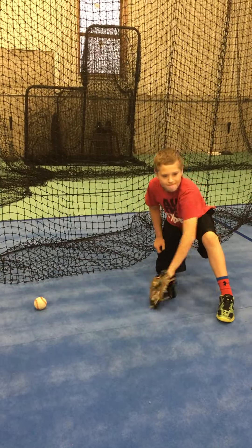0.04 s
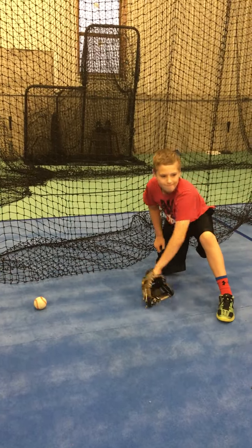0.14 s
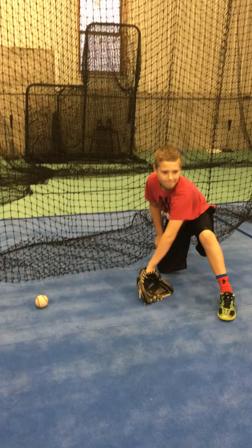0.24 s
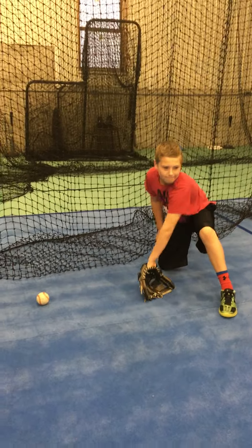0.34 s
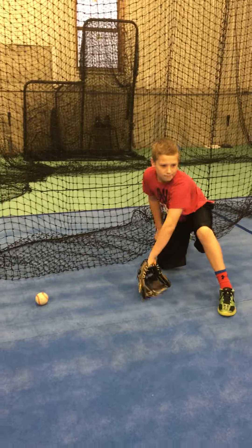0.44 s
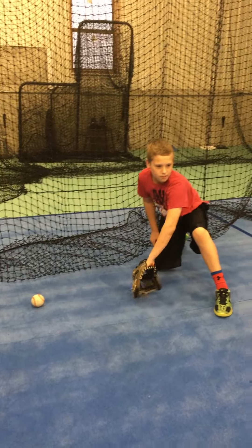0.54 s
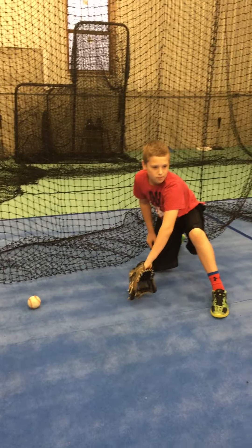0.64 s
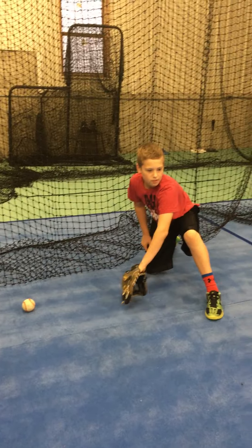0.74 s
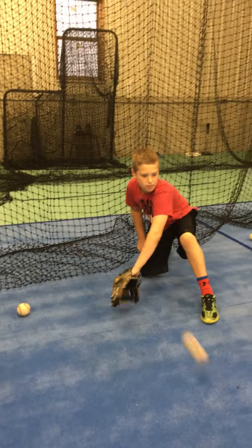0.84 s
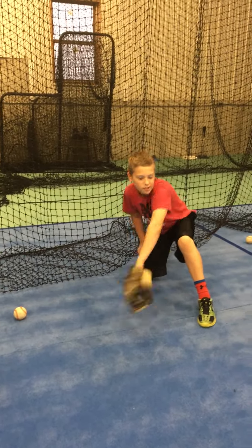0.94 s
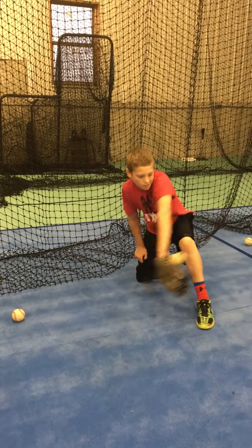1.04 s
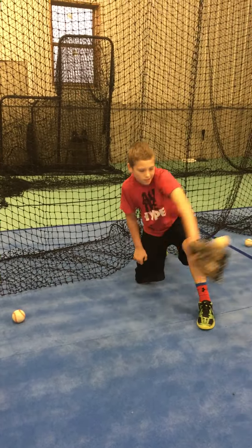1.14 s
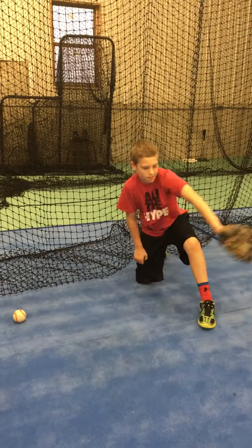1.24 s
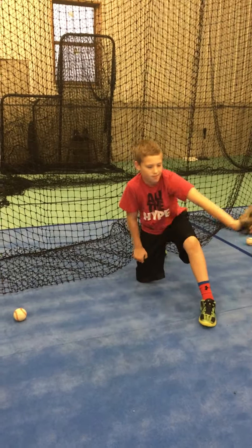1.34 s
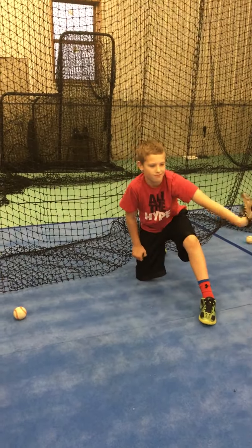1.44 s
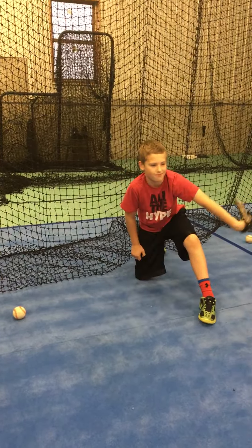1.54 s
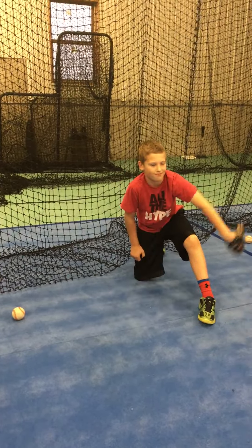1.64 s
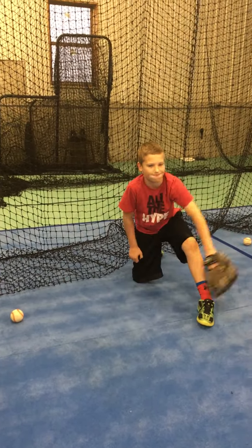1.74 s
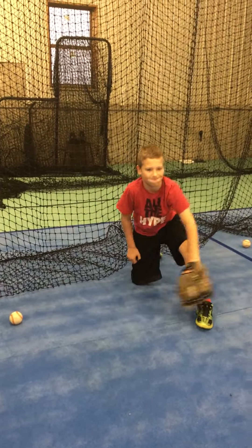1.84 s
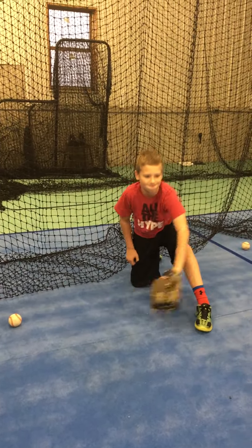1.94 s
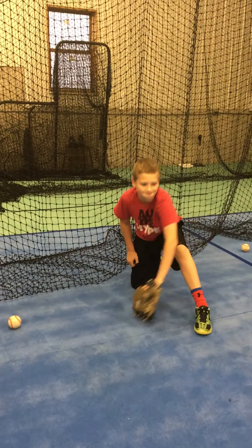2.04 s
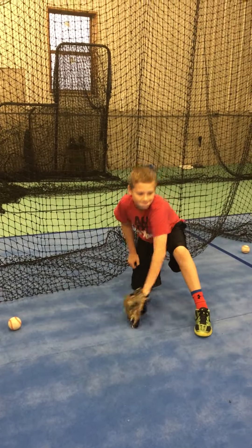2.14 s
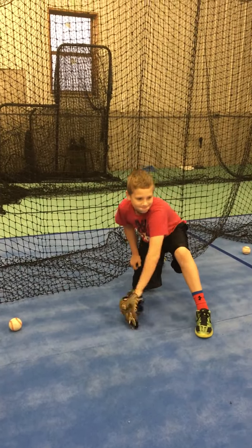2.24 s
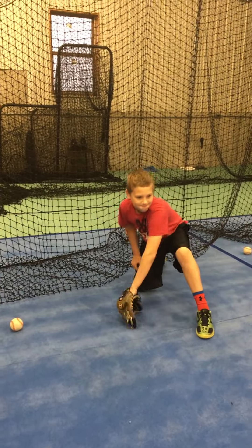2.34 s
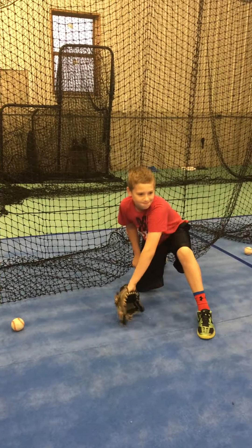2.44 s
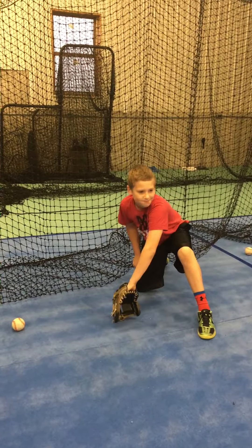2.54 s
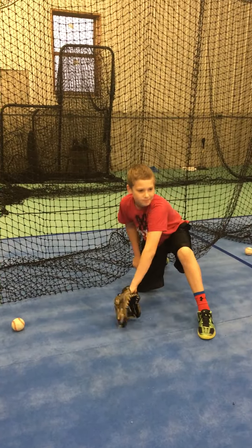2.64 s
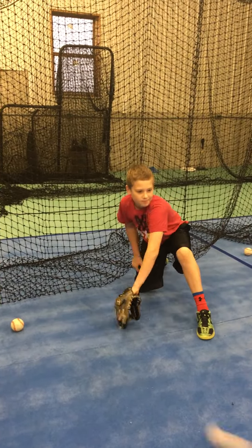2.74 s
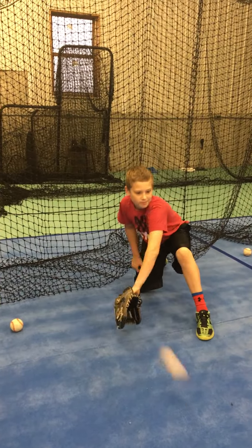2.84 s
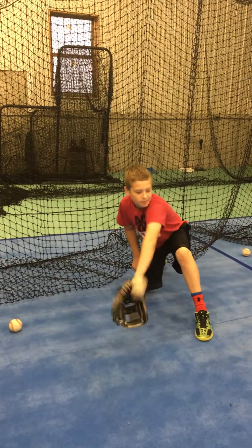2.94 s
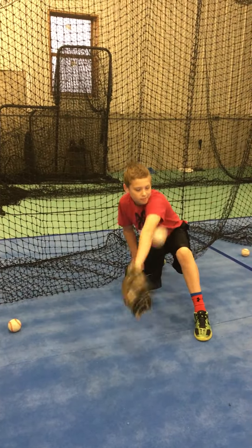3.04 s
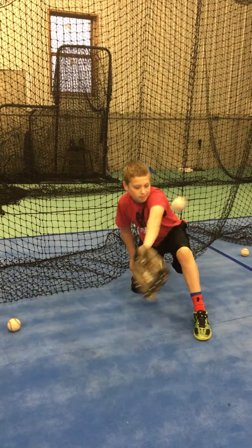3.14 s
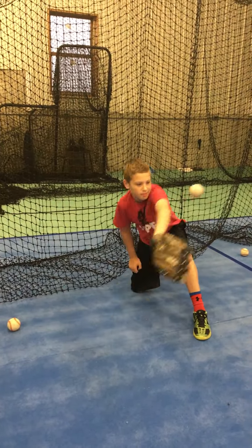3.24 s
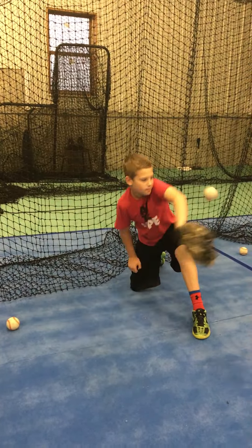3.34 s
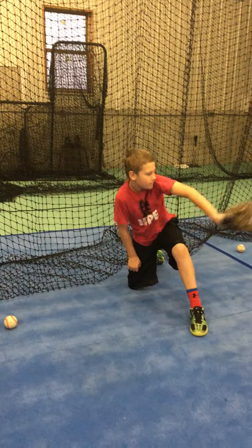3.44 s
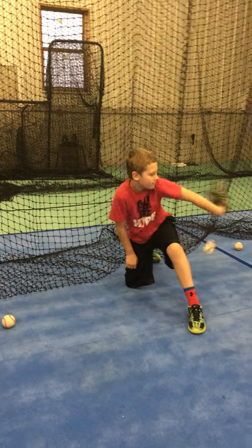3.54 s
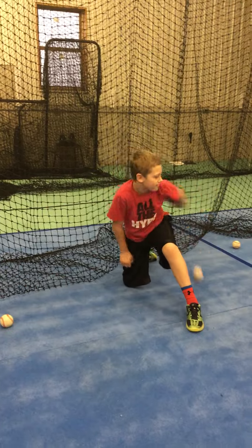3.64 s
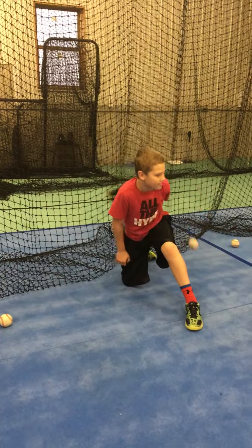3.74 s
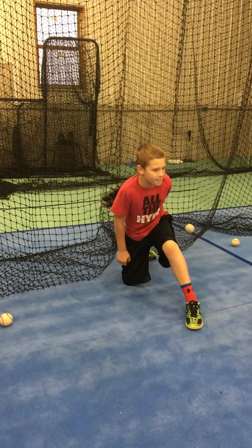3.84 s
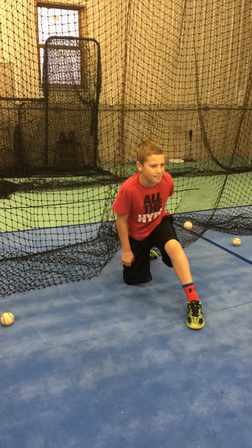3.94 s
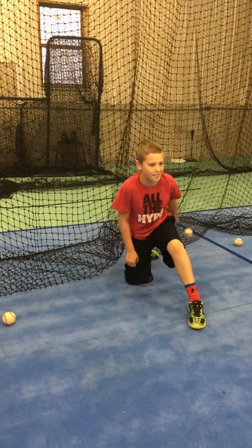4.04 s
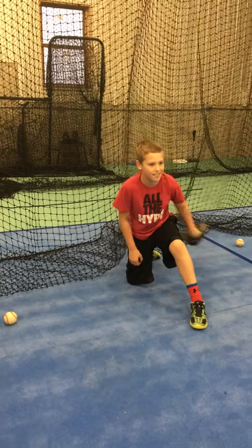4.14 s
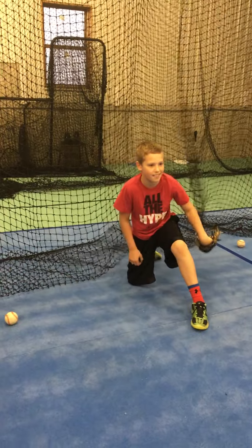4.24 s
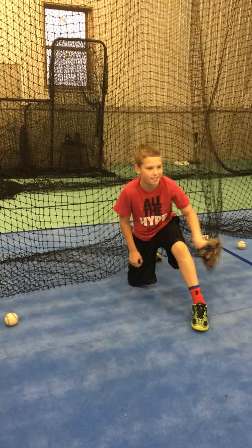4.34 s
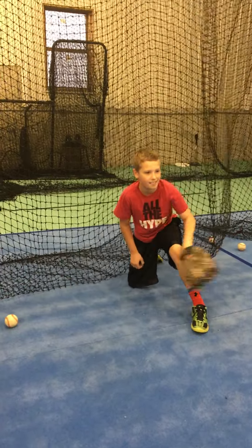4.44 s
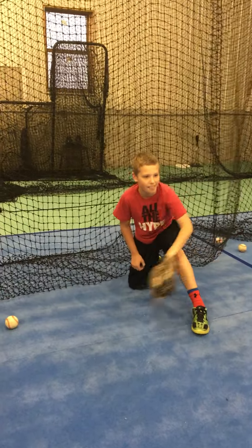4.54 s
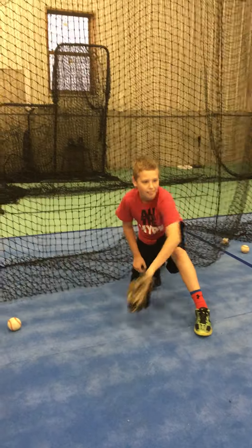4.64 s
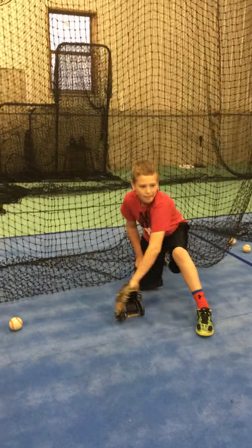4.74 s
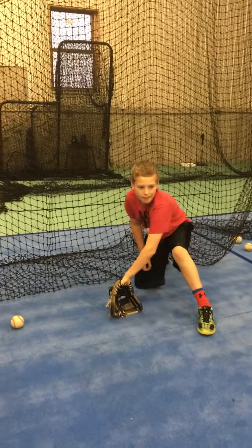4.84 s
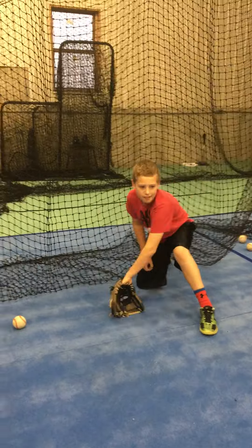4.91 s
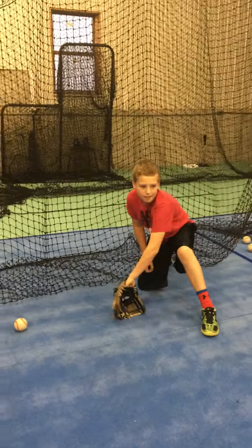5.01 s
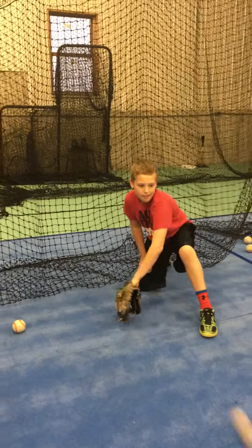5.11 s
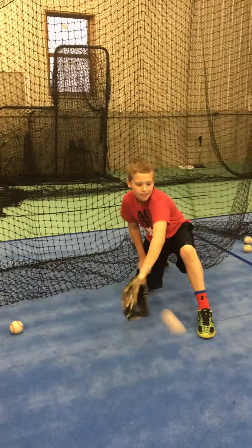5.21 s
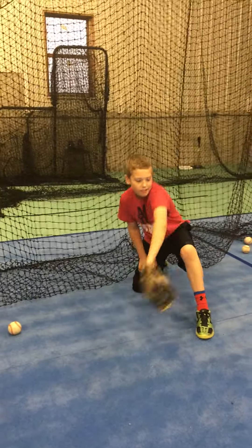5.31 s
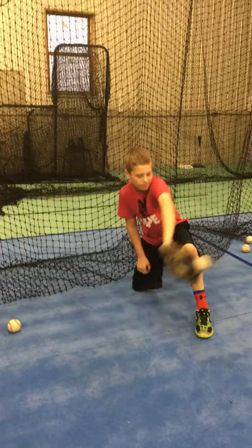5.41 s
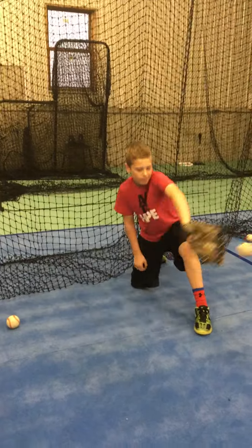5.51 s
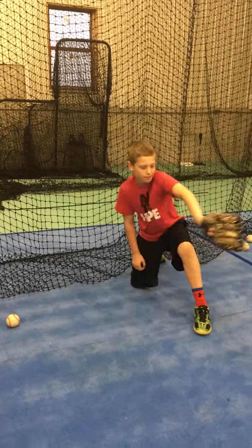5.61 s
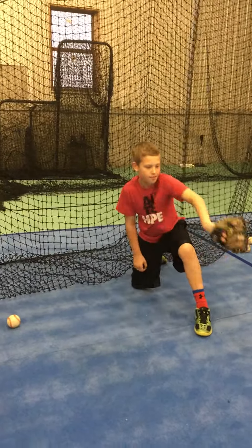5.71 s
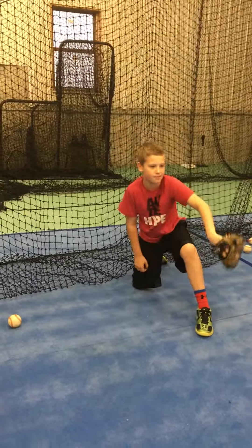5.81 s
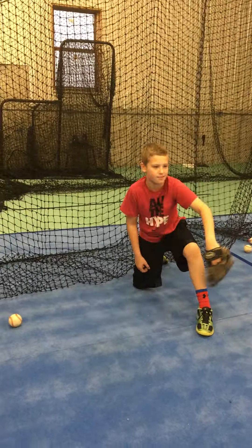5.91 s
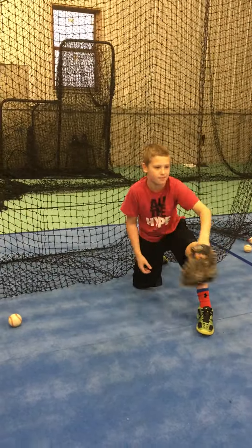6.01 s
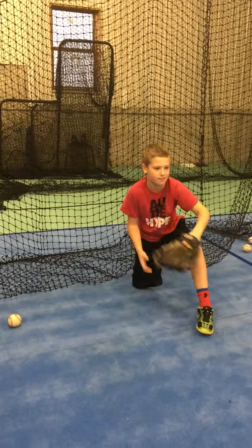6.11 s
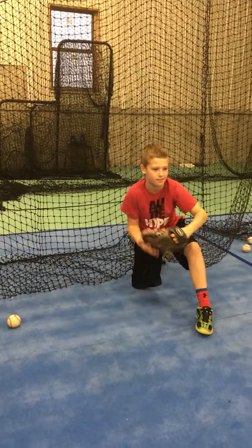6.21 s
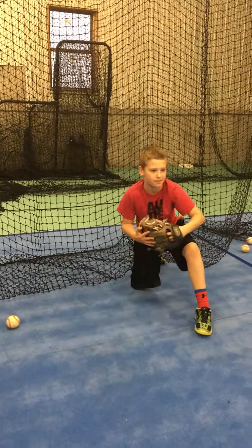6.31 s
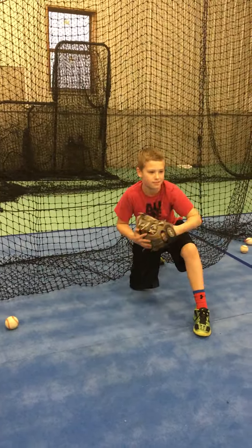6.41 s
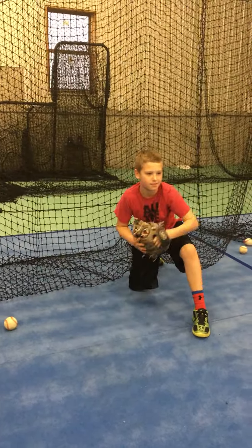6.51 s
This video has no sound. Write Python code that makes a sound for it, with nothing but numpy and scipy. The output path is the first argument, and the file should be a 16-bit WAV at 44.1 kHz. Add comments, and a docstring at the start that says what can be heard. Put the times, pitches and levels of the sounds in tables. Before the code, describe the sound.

Three fielding catches: each a dull, hard bounce followed at once by a leathery smack, the first sharpest. After each, the ball drops away with a more distant, reverberant knock, light rolling scuffs, small clicks and sliding netting. Soft knee and shoe shuffles close the sequence. A nearby handheld phone picks up a hard-walled sports hall with a faint bass rumble of moving air.

```python
"""Baseball fielding drill in an indoor cage

A baseball hops on the turf and smacks into a leather glove, three times; later hops sound farther off.
Knocks, thumps and hollow notes are damped vibrations; cracks, scuffs and sliding netting are shaped noise.
The hall answers the blows with echoes and a fading tail, over a low ventilation rumble."""
import sys
import numpy as np
from scipy import signal
from scipy.fft import rfft, irfft, next_fast_len
from scipy.io import wavfile
from scipy.ndimage import uniform_filter1d

SR = 44100
rng = np.random.default_rng(int(sys.argv[2]) if len(sys.argv) > 2 else 0)


def persist_wave(psi):
    """Save psi, clipped to +-1, as 16-bit WAV."""
    counts = np.round(np.clip(psi, -1, 1) * 32767).astype(np.int16)
    wavfile.write(sys.argv[1], SR, np.atleast_2d(counts).T)


N = 289737  # length of the scene [samples]
HALL_RADIUS_M = 3.38  # a source's distance over this sets the gain of its hall sound


def amp(db):
    """Turn decibels into gain."""
    return 10 ** (np.asarray(db) / 20)


def unit(x):
    """Scale a signal to rms 1."""
    return x / np.sqrt(np.mean(x ** 2) + 1e-20)


def along(points, hz):
    """Read a curve of (frequency [Hz], value) points on a log frequency axis."""
    point_hz, values = np.transpose(points)
    return np.interp(np.log(hz + 1), np.log(point_hz), values)


def noise(spectrum, size):
    """Noise of rms 1, coloured by weighting each frequency of random samples."""
    hz = np.fft.rfftfreq(size, 1 / SR)
    white = rfft(rng.standard_normal(size))
    return unit(irfft(white * amp(along(spectrum, hz)), size))


def fade(t, t60):
    """Exponential decay from t = 0 that loses 60 dB in t60 seconds."""
    return np.exp(-np.log(1000) * np.maximum(t, 0) / t60) * (t >= 0)


def ring(t, hz, t60):
    """One damped vibration: a sine that dies away."""
    return np.sin(2 * np.pi * hz * t) * fade(t, t60)


def push(t, hz, t60, rise):
    """A damped vibration that swells briefly; its rate of change is heard, so no steady pressure is left."""
    motion = ring(t, hz, t60) * (1 - np.exp(-np.maximum(t, 0) / rise))
    return np.diff(motion, prepend=0) * SR / (2 * np.pi * hz)


def puff(spectrum, size=256):
    """One sharp pressure pulse of unit energy with this colour."""
    hz = np.fft.rfftfreq(size, 1 / SR)
    pulse = np.roll(irfft(amp(along(spectrum, hz))), size // 2)
    return pulse / np.linalg.norm(pulse)


def soften(x, edge_hz, order):
    """Low-pass filter: a contact that takes time loses its sharpest treble."""
    sos = signal.butter(order, min(edge_hz, SR / 2 - 1), fs=SR, output="sos")
    return signal.sosfilt(sos, x)


def add(track, s, x):
    """Mix x into the track at time s [s]."""
    i = max(round(s * SR), 0)
    track[i:i + len(x)] += x[:max(len(track) - i, 0)]


def hall(x, build=0.0085, sparse=0.086):
    """The hall's answer from one spot: a few wall echoes, then a tail that thickens and darkens."""
    # first wall echoes: (delay [s], level before softening [dB])
    walls = [(.0129, -12), (.0202, -11), (.0350, -16), (.0398, -15)]
    # time for the tail to lose 60 dB: (frequency [Hz], time [s])
    tail_t60 = [(100, 0.27), (260, 1.91), (600, 0.73), (1100, 1.115), (2500, 1.006), (5000, 0.72),
                (8000, 0.63), (14000, 0.26)]
    # colour of the tail: (frequency [Hz], relative level [dB])
    tail_tone = [(50, -12), (130, 5), (340, -0.5), (520, 5), (800, -3), (2000, -1), (4000, -1.5),
                 (9000, -5), (15000, -1.5)]
    hz, t, z = signal.stft(rng.standard_normal(SR + SR // 4), SR, nperseg=256)
    z = z * amp(along(tail_tone, hz))[:, None] * fade(t, along(tail_t60, hz)[:, None])
    tail = signal.istft(z, SR, nperseg=256)[1]
    t = np.arange(len(tail)) / SR
    # scattered sound is still thin when the first wall answers
    tail *= (1 - np.exp(-(t / build) ** 2)) / np.sqrt(SR * .08)
    # single reflections, about 170 a second, stand out before the echoes merge
    hits = rng.choice([-1, 1], len(t)) * (rng.random(len(t)) < 170 / SR)
    echoes = amp(-15) * hits * np.exp(-t / sparse) * (t > walls[1][0])
    for delay, db in walls:
        echoes[round(delay * SR)] += amp(db)
    return signal.fftconvolve(x, tail + soften(echoes, edge_hz=2300, order=1))


def ventilation():
    """Moving air gives a steady rumble: noise that is strongest in the bass."""
    # colour of the rumble: (frequency [Hz], relative level [dB])
    air = [(12, -23), (20, -56), (50, 3), (74, 3.5), (130, -3), (177, -10.5), (210, -9.5), (422, -20),
           (472, -18), (527, -18.5), (1030, -28.5), (1220, -26.5), (2670, -38.5), (8180, -42),
           (16000, -44.5)]
    return amp(-59.0) * noise(air, N)


def swish(grain_db=2):
    """Netting and cloth slide in a grainy hiss; every stroke swells to a rounded peak and dies away."""
    # strokes of netting and cloth: (time near the peak [s], level [dB], time scale of the rise [s])
    swishes = [(.17, -67, 0.18), (.64, -70, 0.043), (1.84, -71, 0.08), (2.07, -63.5, 0.049),
               (2.25, -65, 0.13), (2.67, -74, .045), (3.579, -71, 0.031), (3.8, -62.5, 0.03),
               (4.189, -53.5, 0.042), (4.3, -65.5, 0.21), (6.38, -70.5, 0.086), (6.52, -68.5, 0.11)]
    # colour of the sliding netting: (frequency [Hz], relative level [dB])
    net = [(300, -3), (1200, 5), (2500, 1), (4500, -5.5), (6500, -6.5), (9000, -9), (10500, -14.5),
           (13000, -13), (16000, -32)]
    release = 0.99  # time to die away over time to rise
    t = np.arange(N) / SR
    power = amp(-76) ** 2  # faint hiss that stays between the strokes
    for s, db, rise in swishes:
        u = (t - s) / rise
        stroke = 2 * np.exp(-np.logaddexp(-u, u / release))
        power = power + (amp(db) * stroke) ** 2
    wobble = unit(uniform_filter1d(rng.standard_normal(N), size=150))
    grain = unit(amp(grain_db * wobble))
    return np.sqrt(power) * grain * noise(net, N)


def rubs(strokes, spectrum, hall_db):
    """Rubbing makes short noise strokes that swell and die, roughened by the grain of the turf."""
    out = np.zeros(N)
    for s, db, length in strokes:
        u = np.arange(SR // 2) / SR / length
        wobble = unit(uniform_filter1d(rng.standard_normal(len(u)), size=240))
        grain = unit(amp(4 * wobble))
        swell = 2 * np.sqrt(u) * np.exp(-2 * u * u)
        add(out, s, amp(db) * noise(spectrum, len(u)) * grain * swell)
    return out + amp(hall_db) * hall(out)[:N]


def shuffles():
    """Knees and shoes shift with soft thuds: short strokes of dull noise."""
    # soft thuds: (start [s], relative level [dB], time scale [s])
    thuds = [(.07, -57, 0.057), (1.84, -53.5, 0.048), (4.07, -58.5, .025), (4.45, -55, 0.032),
             (6.39, -50.5, 0.084), (6.512, -46, 0.015), (6.55, -46, 0.019)]
    # colour of the thuds: (frequency [Hz], relative level [dB])
    body = [(40, -2), (90, 4.5), (200, 4), (330, 2), (600, -19), (1200, -8), (4000, -91)]
    return rubs(thuds, body, hall_db=1)


def scuffs():
    """Balls roll and scuff over the turf: strokes of noise whose treble is weak."""
    # strokes of the ball: (start [s], relative level [dB], time scale [s])
    strokes = [(0, -50, 0.036), (1.81, -48.5, 0.04), (3.559, -57, 0.016), (3.94, -51.5, 0.033),
               (3.972, -48, 0.021), (4.012, -49.5, 0.025), (4.14, -62.5, 0.34), (6.305, -51.5, 0.063),
               (6.345, -48, 0.069), (6.387, -47, 0.025), (6.54, -52.5, 0.027)]
    # colour of the turf: (frequency [Hz], relative level [dB])
    turf = [(100, -4), (300, -11), (650, -7.5), (1500, -6), (2800, -13), (4000, -24), (9000, -34),
            (16000, -46)]
    return rubs(strokes, turf, hall_db=-0.5)


def ticks():
    """Laces and netting click: tiny bursts of quickly fading noise, with their echo."""
    # small clicks: (time [s], relative level [dB])
    clicks = [(1.4255, -63), (1.8125, -56), (1.8905, -51), (3.1720, -54), (3.5625, -61), (4.3675, -46),
              (5.4715, -49), (5.7765, -63)]
    colour = [(500, 9.0), (2500, -4), (8000, -3), (16000, -6)]  # (frequency [Hz], relative level [dB])
    out, t = np.zeros(N), np.arange(SR // 20) / SR
    snap = fade(t, t60=.028)
    for s, db in clicks:
        add(out, s, amp(db) * snap * noise(colour, len(t)) / 2)
    return out + amp(3) * hall(out)[:N]


def bumps():
    """A spent ball rings the edge of the cage: several damped vibrations make one hollow note."""
    # ball against the edge: (time [s], relative level [dB], gain of its hall sound [dB])
    knocks = [(.003, -50, 4.5), (1.8436, -43.5, -3.5), (3.977, -39, -7.5), (4.0130, -44, 1),
              (6.4864, -41, -5)]
    # vibrations of the hollow edge: (frequency [Hz], relative level [dB], time to lose 60 dB [s])
    edge = [(173, 12.5, 0.032), (604, 10.5, 0.032), (1180, -5, 0.0033), (2450, -15, .015)]
    out, t = np.zeros(N), np.arange(SR // 8) / SR
    for s, db, hall_db in knocks:
        note = amp(db - 3) * sum(amp(level) * push(t, hz, t60, rise=0.0021) for hz, level, t60 in edge)
        add(out, s, note)
        add(out, s, amp(hall_db) * hall(note))
    return out


def bounces():
    """The hard ball knocks, the padded floor thumps a moment later, and the turf fibres tick."""
    # ball on turf: (time [s], relative knock level [dB], knock pitch [Hz], knock time to lose 60 dB [s],
    # relative thump level [dB], thump pitch [Hz], distance [m])
    hops = [(0.8921, -27, 770, 0.0062, -17.5, 256, 2.28), (1.668, -19, 770, 0.0069, -30, 155, 4.04),
            (2.001, -41, 865, 0.012, -44, 206, 2.5), (2.2213, -39.5, 1020, 0.005, -40.5, 290, 4.7),
            (2.876, -14, 747, 0.0067, -19.5, 227, 1.92), (3.7601, -14.5, 880, 0.0028, -25, 163, 4.12),
            (4.5322, -43, 1111, 0.0077, -57, 200, 3.8), (5.2256, -16, 877, 0.0068, -23.5, 190, 1.77),
            (5.9860, -13.5, 734, 0.0047, -32, 159, 3.32), (6.365, -24, 725, 0.005, -46, 179, 3.2)]
    fibres = [(1000, 11.5), (4000, -9.5), (9000, -11.5), (16000, -26)]  # (frequency [Hz], relative level [dB])
    out, t = np.zeros(N), np.arange(SR // 12) / SR
    for s, knock_db, knock_hz, knock_t60, thump_db, thump_hz, distance in hops:
        knock = push(t, knock_hz, knock_t60, rise=0.00035)
        knock = -1.8 * amp(knock_db) * soften(knock, edge_hz=2620, order=6)
        thump = push(t - .0018, thump_hz, t60=0.011, rise=0.00074)
        thump = -2.3 * amp(thump_db) * soften(thump, edge_hz=404, order=2)
        # tick and thump grow together as the ball digs in
        tick = amp(thump_db - 15.5) * noise(fibres, len(t)) * fade(t, t60=0.015)
        add(out, s, knock + thump + tick)
        # the wide floor under the turf adds a low boom, heard only through the hall
        boom = amp(knock_db - 17) * push(t, hz=116, t60=0.054, rise=0.0025)
        # ball and floor reach the hall by different paths; farther off, the hall's share grows
        echo = hall(knock + tick) + amp(-5) * hall(thump) + hall(boom)
        add(out, s, distance / HALL_RADIUS_M * echo)
    return out


def catches():
    """The leather cracks and pops as the ball hits; the hollow palm and the forearm thump."""
    # ball in glove: (time [s], relative pop level [dB], pitch ratio of the leather, relative crack level [dB],
    # crack treble edge [Hz], relative palm level [dB], palm pitch [Hz])
    blows = [(1.0233, -13.5, 0.985, -25, 10200, -27.5, 352), (3.0071, -33, 1.4, -34.5, 12000, -40.5, 274),
             (3.0107, -23, 0.83, -27, 4100, -30, 215), (5.3831, -28.5, 0.58, -23.5, 17000, -31.5, 400),
             (5.3930, -32, 0.89, -30, 6550, -27, 175)]
    # vibrations of the leather: (frequency at ratio 1 [Hz], relative level [dB], time to lose 60 dB [s])
    leather = [(1000, -7.5, 0.024), (1190, -2.5, 0.015), (1405, -6, 0.014), (3250, -0.5, 0.0024),
               (4080, -7.5, 0.0087), (5640, 2, 0.0011)]
    # colour of the crack: (frequency [Hz], relative level [dB])
    crack_colour = [(200, -21.5), (600, 10), (1800, 2.5), (4000, -8.5), (7000, -14), (9000, -7),
                    (12000, -15), (16000, -6)]
    out, t = np.zeros(N), np.arange(SR // 12) / SR
    # a short slap, with a weaker and longer crackle as the glove closes round the ball
    slap = fade(t, t60=.011)
    crackle = amp(-18.5) * fade(t, t60=0.075)
    hall_gain = 1.826 / HALL_RADIUS_M  # distance of the glove [m] over the hall radius
    for s, pop_db, ratio, crack_db, edge_hz, palm_db, palm_hz in blows:
        pop = np.zeros(len(t))
        for k, (hz, db, t60) in enumerate(leather):
            # neighbouring vibrations start in opposite directions
            pop += (-1) ** k * amp(db) * push(t, hz * ratio, t60, rise=0.000048)
        pop *= amp(pop_db)
        crack = amp(crack_db) * noise(crack_colour, len(t)) * (slap + crackle)
        hollow = push(t, palm_hz, t60=0.03, rise=0.00023)
        forearm = amp(-3.0) * push(t, hz=114, t60=0.029, rise=0.0012)
        palm = amp(palm_db) * (hollow + forearm)
        add(out, s, pop + soften(crack, edge_hz, order=2) + palm)
        add(out, s, hall_gain * (hall(pop) + amp(4) * hall(palm)))
        # summed over all directions the crack is one smooth pulse
        pulse = soften(puff(crack_colour), edge_hz, order=2)
        add(out, s, hall_gain * amp(crack_db + 19) * hall(pulse))
    return out


def scene():
    """The drill over the hall's steady rumble, as one channel."""
    background = ventilation() + swish() + shuffles()
    ball = scuffs() + ticks() + bumps() + bounces() + catches()
    return (background + ball)[None]


def record(dry, bass_hz=42, top_hz=15850):
    """The phone thins the deep bass and keeps nothing above its band limit."""
    thin = signal.sosfilt(signal.butter(2, bass_hz, "high", fs=SR, output="sos"), dry)
    m = next_fast_len(N + SR // 2)
    kept = np.fft.rfftfreq(m, 1 / SR) < top_hz
    return irfft(rfft(thin, m) * kept, m)[..., :N]


dry = scene()
out = record(dry)
persist_wave(out)
```